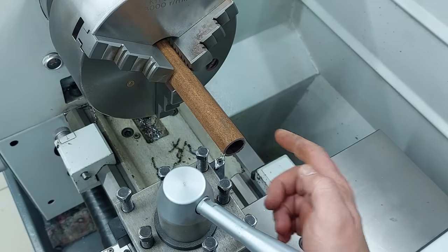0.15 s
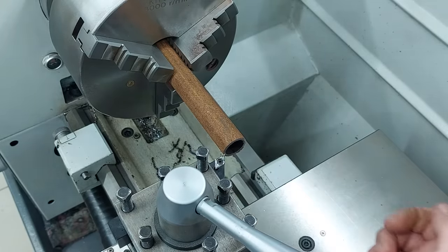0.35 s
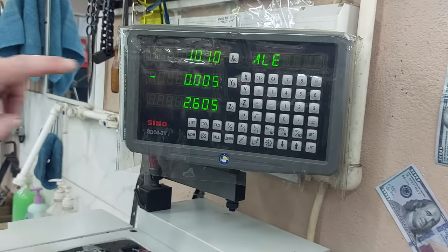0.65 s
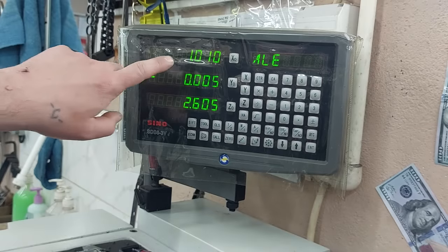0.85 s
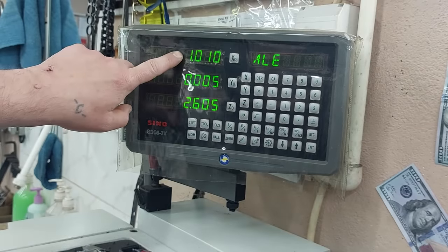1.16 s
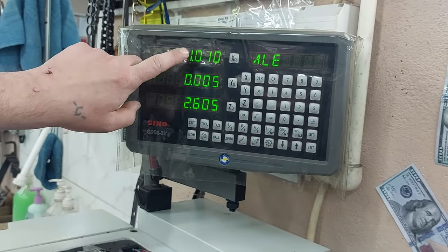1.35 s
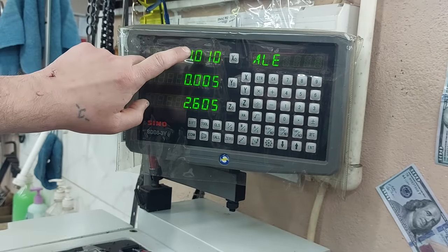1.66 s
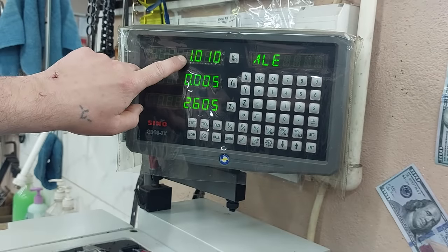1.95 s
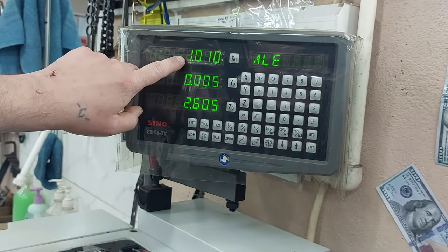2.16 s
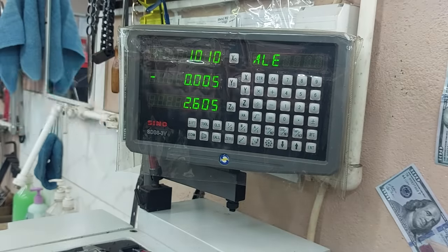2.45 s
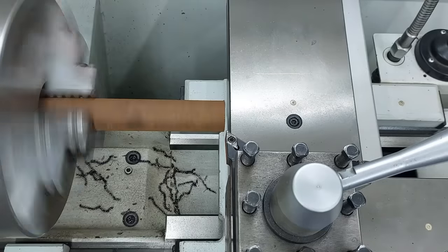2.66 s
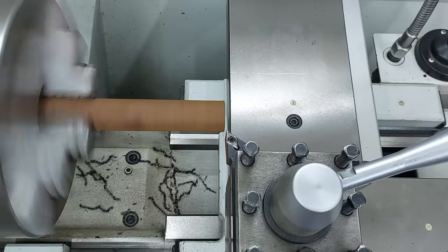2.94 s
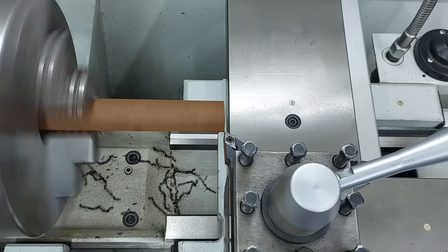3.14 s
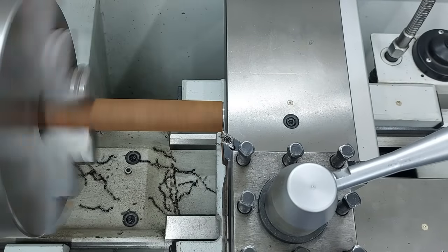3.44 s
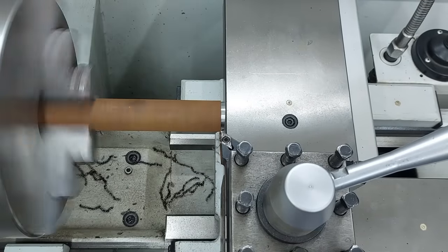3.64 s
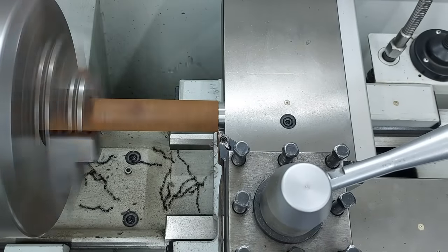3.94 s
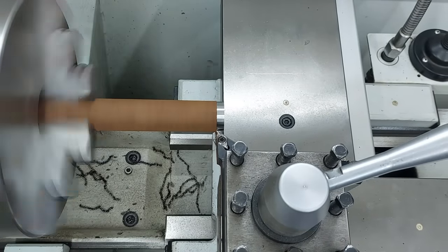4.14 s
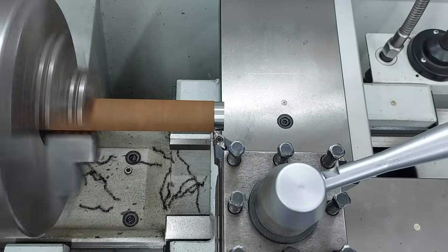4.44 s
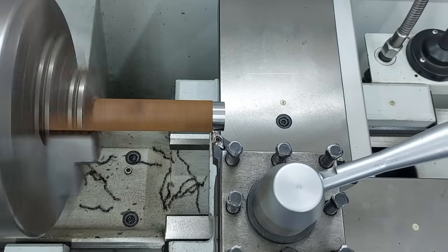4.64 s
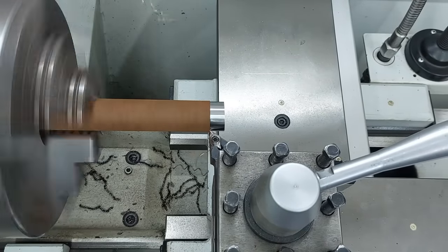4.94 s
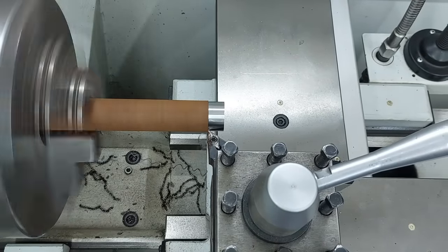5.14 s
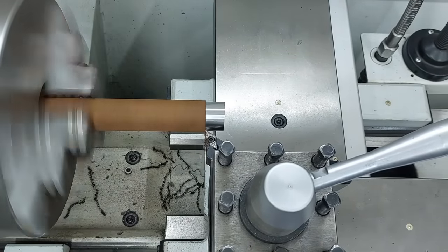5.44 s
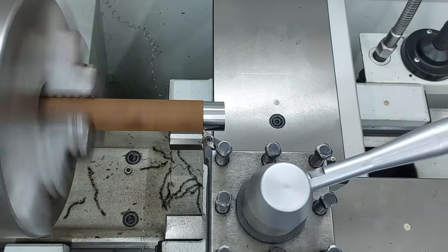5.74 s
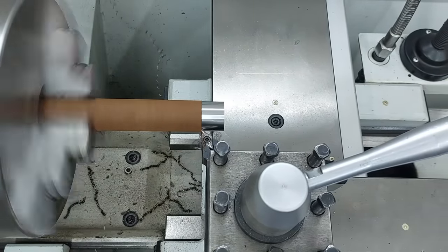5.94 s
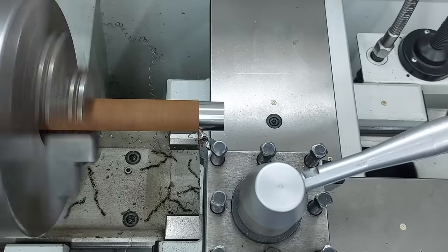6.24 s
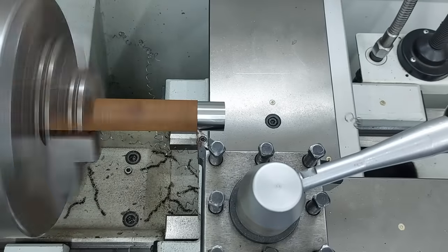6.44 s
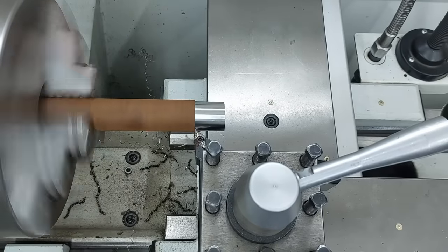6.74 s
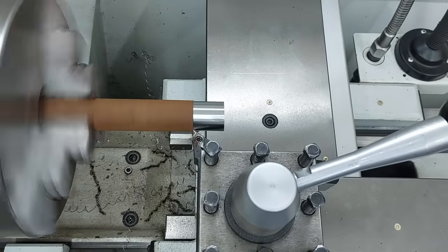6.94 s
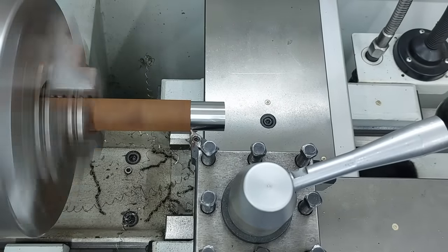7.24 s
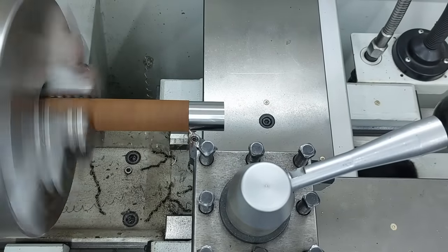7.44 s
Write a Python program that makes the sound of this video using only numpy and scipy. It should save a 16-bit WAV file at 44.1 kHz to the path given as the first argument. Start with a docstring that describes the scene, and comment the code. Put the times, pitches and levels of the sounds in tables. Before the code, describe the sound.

From 0 to 2.5 s a quiet workshop: low fan rumble and soft cabinet hum, leaning left in the lower mids. A sleeve rustles briefly around 0.2 s; the background blinks out for an instant near 0.53 s. Faint airy whistles pass at 0.65 and 1.6 s. Light hollow fingertip taps on a panel come at 1.14-1.19, a cluster at 1.46-1.52, and another at 1.83-1.87 s. At 2.52 s the bass drops away. A lever clicks at about 2.6 s and a contactor slams at 2.64 s, crunchy with a short metallic rattle. The lathe runs up almost instantly with low clatter, dips until 2.83, then swells by 3.03 s into loud bright hiss and shrill gear whine. The tool bites at 3.2 s with a low clatter burst; pitch sags minutely and creeps back. Around 5.1-5.6 s the tone colour shifts subtly, then the cutting runs steadily to the end.

```python
"""Quiet workshop: fan noise and cabinet hum, filtered-noise sleeve rustles, faint whistles, small resonant taps.
The shop then sounds closer, its bass cut: a lever clicks and a contactor slams (decaying noise resonances).
A lathe spins up: gear teeth whine as sines that follow the spindle speed, over noise that rings the steel body.
The tool bites, the pitch sags and creeps up, and the colour changes as the tool works its way along a tube."""
import sys
import numpy as np
from scipy import signal
from scipy.fft import rfft, irfft
from scipy.io import wavfile
from scipy.ndimage import uniform_filter1d

SR = 44100
rng = np.random.default_rng(int(sys.argv[2]) if len(sys.argv) > 2 else 0)


def dump(signal):
    """Clip the signal to [-1, 1] and save it as 16-bit WAV at the path in sys.argv[1]."""
    limited = np.clip(np.atleast_2d(signal).T, -1, 1)
    pcm = np.round(limited * 32767).astype(np.int16)
    wavfile.write(sys.argv[1], SR, pcm)


N = 334719
HZ = np.fft.rfftfreq(N, 1 / SR)
TIME = np.arange(N) / SR

# shop air spectrum, scaled to SHOP_AIR_DB: (frequency [Hz], relative density [dB])
SHOP_AIR = [(25, -36), (71, -6), (144, -11), (230, -23), (330, -23), (445, -22.5), (500, -25.5),
            (741, -24.5), (1080, -28), (1250, -34.5), (3800, -40.5), (4200, -45.5), (11200, -51.5),
            (15500, -48)]
# shop air left-right likeness: (frequency [Hz], correlation [-1..1])
SHOP_ALIKE = [(60, 0.86), (130, 0.69), (290, 0.92), (640, -0.0074), (1410, -0.031), (3100, -0.087),
              (6820, -0.17), (15000, -0.03)]
# shop air balance: (frequency [Hz], left minus right [dB])
SHOP_PAN = [(60, 7.5), (110, 0), (200, 19.5), (380, 17.5), (700, -5.5), (1290, 1), (2380, 0.5), (4400, 2),
            (8120, 0.5), (15000, 1.5)]
# cabinet hum partials, before the shop gains: (frequency [Hz], mean rms level [dB])
HUM = [(70.0, -68.5), (140.0, -73), (290.7, -65), (436.0, -78), (581.4, -88.5), (732.1, -78.5),
       (829.0, -86.5), (1023, -85), (1448, -94.5)]
# hum partial heard only until the drop-out: (frequency [Hz], mean rms level [dB])
HUM_EARLY = [(829, -82)]
SHOP_AIR_DB, HUM_PAN_DB = -64.5, 3.4
# brief drop-out, then thinning after a gap; gains are (bass, upper)
DROP_OUT_S, DROP_OUT_DB = (.528, .545), (-30, -22)
CLOSER_S, GAP_S, CLOSER_DB = 2.52, .006, (-40, -9)

# sleeve rustles, before the shop gain; rise and fall per 20 dB:
# (peak time [s], level [dB], rise [s], fall [s], thin-hiss share [0-1])
RUSTLES = [(.13, -85, .1, .2, .3), (.217, -71.5, .07, .08, 0), (.43, -86, .35, 0.31, 1),
           (.72, -87, 0.37, .5, 1), (2.43, -89, .35, .4, 1)]
# spectra of rustling cloth and thin hiss: (frequency [Hz], relative density [dB])
CLOTH = [(1000, -30), (1600, -6), (3300, -5), (4500, -8), (7000, -6), (10500, -8), (13000, -13), (16000, -10)]
THIN = [(3000, -12), (8500, -13), (9500, -5), (12000, -3), (13000, -19)]
# faint airy tones: (start [s], end [s], frequency [Hz], width [Hz], level [dB])
WHISTLES = [(0.62, 0.73, 1460, 12, -78.5), (1.53, 1.68, 2560, 150, -80)]
# small taps: (time [s], level [dB], main ring [Hz], thud re tap [dB], left minus right [dB])
TAPS = [(1.14, -64, 2370, -3, 2.5), (1.1893, -53, 2700, -12.5, 4.0), (1.463, -61, 2270, 5.5, 0),
        (1.476, -57.5, 3010, 3, 5), (1.5, -48.5, 2580, -3.5, 2.5), (1.5194, -58, 2600, 0, 4),
        (1.8294, -55.5, 2470, -3, 4), (1.8433, -53.5, 2500, -21, 4), (1.869, -47, 2640, -9, 2)]
# lever clicks; rise and fall per 20 dB: (peak time [s], level [dB], rise [s], fall [s], dullness [0-1])
LEVER = [(2.572, -73.5, .004, .08, 0), (2.611, -61.5, 0.031, 0.045, 0.97)]
# spectra of bright and dull click: (frequency [Hz], relative density [dB])
BRIGHT = [(300, -30), (1500, -8), (2200, -14), (2600, 4), (3000, -12), (3500, 2), (4300, -16), (6000, -11),
          (8000, -25), (16000, -32)]
DULL = [(200, -12), (420, 6), (900, -8), (1400, 0), (3500, -15), (5000, -27), (16000, -38)]

# lathe hiss spectrum without body ringing: (frequency [Hz], relative density [dB])
HISS = [(100, -55), (200, -33), (260, -22), (540, -20), (600, -7), (1500, -8), (1850, -4), (2200, 0),
        (3500, 1), (4200, -3), (4950, -7), (5500, -5), (8000, -5), (10700, -5), (12500, -2), (13600, -4),
        (14200, -8), (14700, -6), (15200, -13), (15700, -12)]
# steel body resonance centres: (frequency [Hz])
BODY_HZ = [250, 440, 545, 615, 738, 805, 873, 965, 1090, 1140, 1290, 1470, 1612, 2012, 2100, 2310, 2628,
           3050, 3480, 4410, 4990, 5100, 5950, 6400, 8190, 13200]
# their shapes, negative = hollow: (width [Hz], gain near tube end [dB], gain further along [dB])
BODY = [(30, 5, 5), (30, 7, 6), (50, -6, -6), (30, 4, 4), (30, 9, 9), (20, 6, 6), (20, 9, 9), (70, -8, -8),
        (40, 7, 6), (20, 9, 8), (60, 9, 7), (20, 6, 6), (30, 10, 10), (20, 6, 6), (40, 6, 7), (20, 5, 6),
        (40, 6, 8), (90, 1, 8), (90, 7, 2), (120, -14, -14), (100, -5, -4), (40, 6, 4), (150, 5, 0),
        (400, 5, 10), (40, 4, 3), (150, -4, -4)]
# hiss left-right likeness: (frequency [Hz], correlation [-1..1])
RUN_ALIKE = [(60, 0.29), (290, 0.86), (640, 0.85), (1400, 0.83), (3100, 0.17), (5000, 0.55), (8000, 0.083),
             (15000, 0.1)]
# hiss balance: (frequency [Hz], left minus right [dB])
RUN_PAN = [(60, 0), (110, 4), (200, 2), (380, -5), (700, 0.5), (1290, -5.5), (2380, 0), (4400, -3.5),
           (8120, 5), (15000, 7.5)]
LEFT_LEAD_S = 4e-5
# hiss level: starts with the slam, sinks, swells to running level
HISS_ON_S, HISS_ATTACK_S, START_DB, SINKS_UNTIL_S, LOWEST_DB = 2.636, .024, -42.5, 2.834, -46
SWELL_S, RUNNING_DB = .2, -39
# extra lows while the gears take up speed; the boost in dB decays by 1/e per START_CLATTER_S
START_CLATTER_DB, START_CLATTER_S = 10.5, .11
# low clatter bursts: (peak time [s], boost of the lows [dB])
CLATTER = [(3.25, 11), (3.41, 3.5)]
CLATTER_RISE_S, CLATTER_FALL_S, LOWS_BELOW_HZ = .083, .12, 1700
MOVES_ALONG_S = (5.13, 5.58)  # colour goes from near the tube end to further along

# contactor slam: (delay after first contact [s], level [dB])
BOUNCES = [(0, -33.5), (.002, -37), (.008, -43)]
# cabinet resonances: (frequency [Hz], width [Hz], level re bounce [dB], T60 [s])
CABINET = [(800, 45, -2, 0.11), (1226, 93, -7, 0.22), (2450, 550, -8, 0.18), (3500, 290, -7, 0.52),
           (3800, 150, -2, 0.11), (4120, 90, -5, 0.22), (4520, 68, -5.5, 0.44), (5950, 430, -2, 0.25),
           (6570, 250, -11, 0.21), (9820, 1400, 4.5, 0.056), (12000, 3000, 1, 0.03)]
SLAM_S = 2.6365

# gear and bearing tones at nominal speed: (frequency [Hz])
TOOTH_HZ = [3223, 3459, 3524, 3787, 3937, 3964, 4563, 4692, 4834, 5371, 5975, 7045, 7521, 7927, 8932, 9424,
            9862, 10210, 11284, 11485, 11870, 12896, 13385]
# their mean rms levels at nominal speed and hiss at TONE_REF_HISS_DB:
# (near tube end [dB], further along [dB], left minus right [dB], left lead [rad])
TOOTH = [(-49, -58, -8, -0.085), (-68, -60, 6, 0.61), (-54, -63, -2, -0.029), (-68, -76, -2, 0),
         (-67, -61, 22, -1.6), (-48.5, -55, -5, 2.16), (-58.5, -64, 10, 0.79), (-65, -67, 10, -0.44),
         (-71.5, -61.5, 17, -1.7), (-58.5, -60.5, -9, 0.41), (-58, -68, -12, -1.6), (-59.5, -64, -2, 0),
         (-55, -58, -16, 1.35), (-66, -76, 2, 0), (-48, -50, -0.5, -1.93), (-61, -60.5, -10, -0.36),
         (-62, -57, 0, -0.2), (-49, -49, 3.5, 0.26), (-63, -61, 6, 0.15), (-63.5, -58, -4, -0.23),
         (-55, -53.5, -7, -0.27), (-45, -45, 1.5, 0.85), (-59.5, -51.5, -10, 2.1)]
# motor tones of fixed pitch, same level reference: (frequency [Hz], level [dB], left minus right [dB])
MOTOR = [(292, -82, 0), (738, -64, 0), (873, -63, 0), (1140, -68, 0), (1470, -58, 4), (1612, -65, 0),
         (2100, -61, 0), (2310, -61, 0)]
TONE_REF_HISS_DB = -40
NOMINAL_HZ, SHAFT_HZ = 12896, 28.6  # reference gear tone and shaft rate at nominal speed
WOBBLE_US = (10.5, 3.0)  # tooth timing error, amplitude once and twice a turn
THROB = .3  # once-a-turn swell share at NOMINAL_HZ, proportional to tone frequency
TONE_FLUTTER_DB, MOTOR_FLUTTER_DB, STEREO_DRIFT_RAD = 1.1, 1.5, .2
# drive, as pitch of the reference gear tone: runs up, sags at the bite, creeps up
DRIVE_ON_S, RUN_UP_S, FREE_HZ = 2.6, .07, 12879
BITE_S, BITE_LASTS_S, SAGGED_HZ, SETTLED_HZ, RECOVER_S = 3.17, .13, 12862, 12930, 2.3
TOP_HZ = 15720


def undb(db):
    """dB to amplitude ratio."""
    return 10 ** (np.asarray(db) / 20)


def over_hz(rows):
    """Interpolate a (frequency [Hz], value) table on a log axis."""
    hz, value = np.transpose(rows)
    return np.interp(np.log(HZ + 1), np.log(hz), value)


def sides(pan_db):
    """Left and right gains whose ratio is pan_db."""
    return undb(np.array([pan_db, -pan_db]) / 2)


def ramp(start_s, end_s):
    """0 before start, linear rise, 1 after end."""
    return np.clip((TIME - start_s) / (end_s - start_s), 0, 1)


def swell(peak_s, rise_s, fall_s):
    """Gain 1 at the peak, 20 dB lower rise_s before and fall_s after."""
    return undb(-20 * np.where(TIME < peak_s, (peak_s - TIME) / rise_s, (TIME - peak_s) / fall_s))


def walk(rate_hz):
    """Smoothed random levels, spread near 1, that change about rate_hz times a second."""
    levels = np.repeat(rng.standard_normal(int(rate_hz * N / SR) + 2), 8)
    smooth = 1.3 * uniform_filter1d(uniform_filter1d(levels, size=8), size=8)
    return np.interp(TIME * rate_hz * 8, np.arange(len(smooth)), smooth)


def wide_noise(alike, pan, left_lead_s=0):
    """Left and right white-noise spectra; mid and side weights set their likeness per frequency."""
    likeness = np.clip(over_hz(alike), -1, 1)
    mid, side = rfft(rng.standard_normal((2, N)))
    mid = mid * np.sqrt(1 + likeness)
    side = side * np.sqrt(1 - likeness)
    right_delay = np.exp(-2j * np.pi * HZ * left_lead_s)
    return np.array([mid + side, (mid - side) * right_delay]) * sides(over_hz(pan))


def colour(white, db):
    """Shape a noise spectrum, then scale the left-right mean to rms 1."""
    x = irfft(white * undb(db), N)
    return x / np.std(x.mean(axis=0))


def ring(t, hz, t60_s):
    """One decaying sine mode."""
    return np.sin(2 * np.pi * hz * t) * 1000. ** (-t / t60_s)


def rough_ring(t, hz, width_hz, t60_s):
    """Noise in one resonance, dying away; partly alike left and right."""
    noise = rng.standard_normal((3, len(t)))
    source = noise[0] + 1.13 * noise[1:]
    x = signal.lfilter(*signal.iirpeak(hz, hz / width_hz, fs=SR), source)
    return x / np.std(x) * 1000. ** (-t / t60_s)


def add(out, start_s, x):
    """Mix x into out at start_s."""
    i = int(start_s * SR)
    out[:, i:i + x.shape[-1]] += x


def shop_gains():
    """Bass and upper gains of the idle shop: a brief drop-out, a gap, then a lasting bass cut."""
    drop_out = (TIME > DROP_OUT_S[0]) & (TIME < DROP_OUT_S[1])
    gap = (TIME > CLOSER_S) & (TIME < CLOSER_S + GAP_S)
    db = np.outer(DROP_OUT_DB, drop_out | gap) + np.outer(CLOSER_DB, TIME > CLOSER_S)
    return undb(uniform_filter1d(db, size=130))


def hum(rows):
    """Cabinet hum: sines with slight random level and phase drift."""
    out = 0
    for hz, db in rows:
        gain = np.sqrt(2) * undb(db + .8 * walk(15))
        out = out + gain * np.sin(2 * np.pi * hz * TIME + .3 * walk(10))
    return out


def shop():
    """Fan noise as coloured stereo noise plus cabinet hum, with bass and upper part gained apart."""
    air = undb(SHOP_AIR_DB) * colour(wide_noise(SHOP_ALIKE, SHOP_PAN), over_hz(SHOP_AIR))
    tones = hum(HUM) + hum(HUM_EARLY) * (TIME < DROP_OUT_S[0])
    x = air + tones * sides(HUM_PAN_DB)[:, None]
    upper = signal.sosfiltfilt(signal.butter(2, 400, "high", fs=SR, output="sos"), x)
    bass_gain, upper_gain = shop_gains()
    return (x - upper) * bass_gain + upper * upper_gain


def swells(rows, first, second):
    """Noise swells; each row's share crossfades from the first colour to the second."""
    out = 0
    for peak_s, db, rise_s, fall_s, share in rows:
        out = out + undb(db) * swell(peak_s, rise_s, fall_s) * (first + share * (second - first))
    return out


def sleeves():
    """Rubbing cloth: soft bright noise swells with fluttering level."""
    white = rfft(rng.standard_normal((2, N)))
    cloth = colour(white, over_hz(CLOTH))
    thin = colour(white, over_hz(THIN))
    return swells(RUSTLES, cloth, thin) * undb(1.5 * walk(42)) * shop_gains()[1]


def whistles():
    """Faint airy tones: resonant noise under a rounded envelope."""
    out = np.zeros((2, N))
    for start_s, end_s, hz, width_hz, db in WHISTLES:
        t = TIME[:int((end_s - start_s) * SR)]
        envelope = np.sin(np.pi * t / t[-1]) ** .5
        add(out, start_s, undb(db) * rough_ring(t, hz, width_hz, 9) * envelope)
    return out


def taps():
    """Small impacts: dry tick, hollow body, low thud and a little room tail as decaying modes."""
    out, t = np.zeros((2, N)), TIME[:SR // 3]
    for start_s, db, hz, thud_db, pan_db in TAPS:
        tick = undb(-21) * rough_ring(t, 5500, 9800, .013)
        body = undb(-8) * rough_ring(t, hz, 300, .033) + undb(-22) * rough_ring(t, 3700, 300, .05)
        tail = undb(-32) * rough_ring(t, 7000, 9000, .12) + undb(-20) * rough_ring(t, 2500, 2300, .25)
        thud = ring(t, 318, .077) + .5 * rough_ring(t, 640, 810, .052)
        tap = tick + body + tail + undb(thud_db) * thud
        add(out, start_s, undb(db) * tap * sides(pan_db)[:, None])
    return out


def lever():
    """Two lever clicks: short swells of peaked noise, the second duller."""
    white = rfft(rng.standard_normal((2, N)))
    alike = white + white[::-1] / 2
    bright = colour(alike, over_hz(BRIGHT))
    dull = colour(alike, over_hz(DULL))
    return swells(LEVER, bright, dull) * undb(2.3 * walk(200))


def hiss_level_db():
    """Hiss level: attack, sink, swell to running level."""
    times_s = [HISS_ON_S, HISS_ON_S + HISS_ATTACK_S, SINKS_UNTIL_S, SINKS_UNTIL_S + SWELL_S]
    return np.interp(TIME, times_s, [-110, START_DB, LOWEST_DB, RUNNING_DB])


def patchy(x, patchy_db, wide_bins=5, long_frames=3):
    """Narrow bands swell and sink on their own as the cut goes unevenly."""
    _, _, z = signal.stft(x, nperseg=1024)
    field = uniform_filter1d(rng.standard_normal(z.shape[1:]), size=wide_bins, axis=0)
    field = uniform_filter1d(field, size=long_frames, axis=1)
    return signal.istft(z * undb(patchy_db * field / field.std()), nperseg=1024)[1][:, :N]


def hiss():
    """Rolling and cutting noise through the body, whose ringing changes as the tool moves along."""
    white = wide_noise(RUN_ALIKE, RUN_PAN, LEFT_LEAD_S)
    # countless small modes of the castings ripple the colour
    ripple = uniform_filter1d(uniform_filter1d(rng.standard_normal(len(HZ)), size=150), size=150)
    plain_db = over_hz(HISS) + 2 * (HZ > 1700) * ripple / ripple.std()
    width_hz, near_db, far_db = np.transpose(BODY)
    shapes = [1 / (1 + (2 * (HZ - hz) / width) ** 2) for hz, width in zip(BODY_HZ, width_hz)]
    near = colour(white, plain_db + near_db @ shapes)
    far = colour(white, plain_db + far_db @ shapes)
    x = patchy(near + ramp(*MOVES_ALONG_S) * (far - near), patchy_db=1)
    clatter_db = START_CLATTER_DB * np.exp(-abs(TIME - HISS_ON_S) / START_CLATTER_S)
    for peak_s, db in CLATTER:
        rise, fall = ramp(peak_s - CLATTER_RISE_S, peak_s), ramp(peak_s, peak_s + CLATTER_FALL_S)
        clatter_db = clatter_db + db * (rise - fall)
    low = signal.sosfilt(signal.butter(2, LOWS_BELOW_HZ, fs=SR, output="sos"), x)
    return undb(hiss_level_db()) * (x + (undb(clatter_db) - 1) * low)


def slam():
    """The contactor closes with a crunch and bounces; each contact rattles the cabinet resonances."""
    out, t = np.zeros((2, N)), TIME[:SR // 2]
    attack = np.minimum(t / .0025, 1) ** 2
    for delay_s, bounce_db in BOUNCES:
        rattle = sum(undb(db) * rough_ring(t, hz, width_hz, t60_s) for hz, width_hz, db, t60_s in CABINET)
        add(out, SLAM_S + delay_s, undb(bounce_db) * rattle * attack)
    return signal.sosfilt(signal.butter(3, 450, "high", fs=SR, output="sos"), out)


def drive():
    """Spindle speed as a share of nominal: run-up, sag under the bite, slow recovery."""
    recovery = np.exp(-(TIME - BITE_S - BITE_LASTS_S) / RECOVER_S)
    loaded_hz = SETTLED_HZ - (SETTLED_HZ - SAGGED_HZ) * recovery
    hz = FREE_HZ + ramp(BITE_S, BITE_S + BITE_LASTS_S) * (loaded_hz - FREE_HZ)
    run_up = 1 - np.exp(-(np.maximum(TIME - DRIVE_ON_S, 0) / RUN_UP_S) ** 3)
    return hz / NOMINAL_HZ * run_up


def teeth(turned_s):
    """Gear tones; a slightly eccentric shaft splits the high ones into side lines."""
    shaft = 2 * np.pi * SHAFT_HZ * turned_s
    late_s = 1e-6 * (WOBBLE_US[0] * np.sin(shaft) + WOBBLE_US[1] * np.sin(2 * shaft + 1))
    travel, out = ramp(*MOVES_ALONG_S), 0
    for hz, (near_db, far_db, pan_db, lead_rad) in zip(TOOTH_HZ, TOOTH):
        phase = 2 * np.pi * hz * (turned_s + late_s) + .3 * walk(15) + rng.uniform(0, 2 * np.pi)
        level_db = near_db + travel * (far_db - near_db) + TONE_FLUTTER_DB * walk(12)
        throb = 1 + THROB * hz / NOMINAL_HZ * np.sin(shaft + rng.uniform(0, 2 * np.pi))
        gain = np.sqrt(2) * undb(level_db) * throb
        turn = lead_rad / 2 + STEREO_DRIFT_RAD * walk(4.05)
        out = out + gain * np.sin([phase + turn, phase - turn]) * sides(pan_db)[:, None]
    return out


def motor():
    """Motor tones: sines at fixed pitch with fluttering level and phase."""
    out = 0
    for hz, db, pan_db in MOTOR:
        gain = np.sqrt(2) * undb(db + MOTOR_FLUTTER_DB * walk(14))
        tone = gain * np.sin(2 * np.pi * hz * TIME + .36 * walk(10))
        out = out + tone * sides(pan_db)[:, None]
    return out


def gears():
    """Tooth and motor tones, levelled with the hiss; the whine only stands out near full speed."""
    speed = drive()
    turned_s = np.cumsum(speed) / SR  # time at nominal speed for the same turns
    return undb(hiss_level_db() - TONE_REF_HISS_DB) * (teeth(turned_s) + motor()) * speed ** 12


def scene():
    """Sum of all sources."""
    return shop() + sleeves() + whistles() + taps() + lever() + hiss() + slam() + gears()


def record(dry):
    """The recorder cuts steeply above TOP_HZ."""
    return signal.sosfilt(signal.ellip(14, .2, 80, TOP_HZ, fs=SR, output="sos"), dry)


dry = scene()
out = record(dry)
dump(out)
```